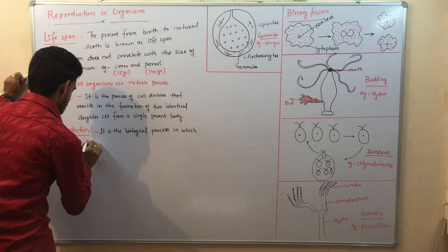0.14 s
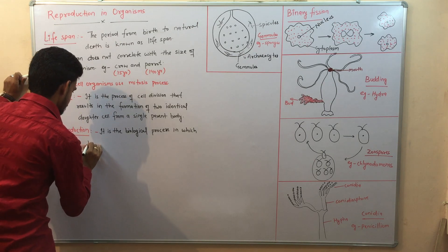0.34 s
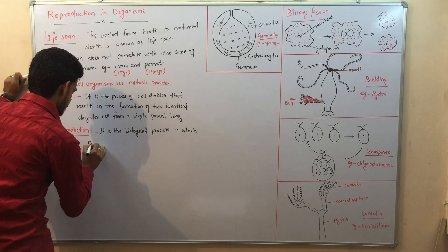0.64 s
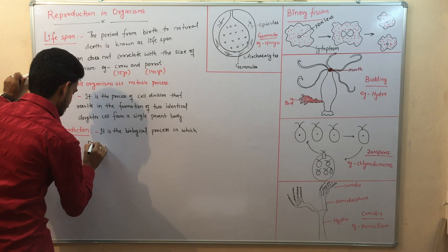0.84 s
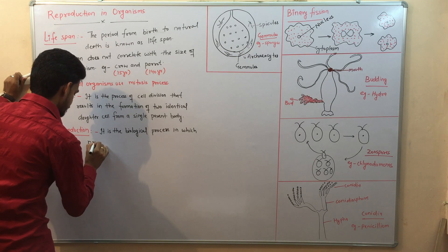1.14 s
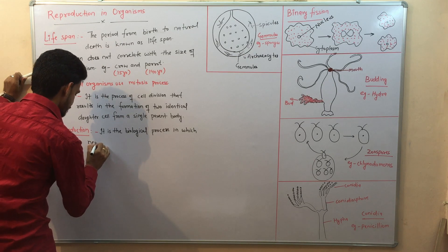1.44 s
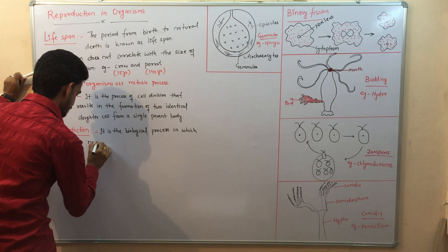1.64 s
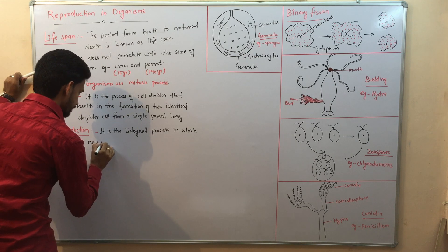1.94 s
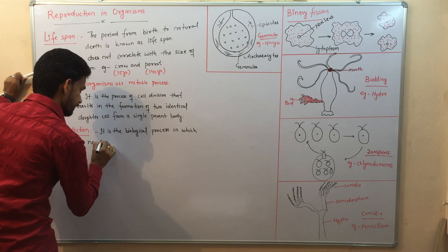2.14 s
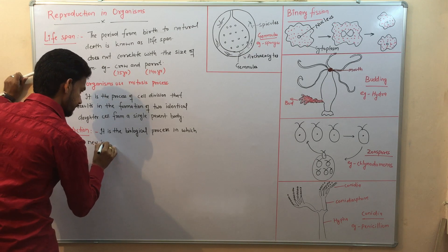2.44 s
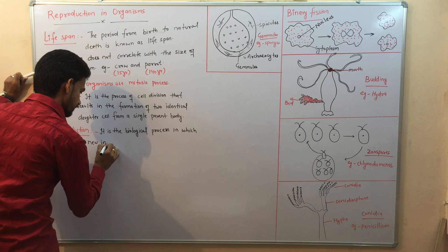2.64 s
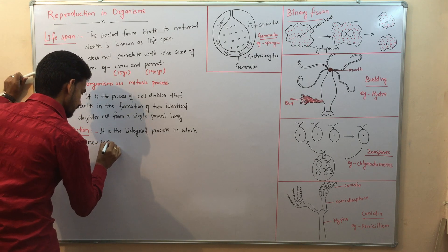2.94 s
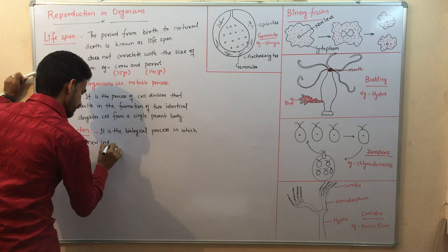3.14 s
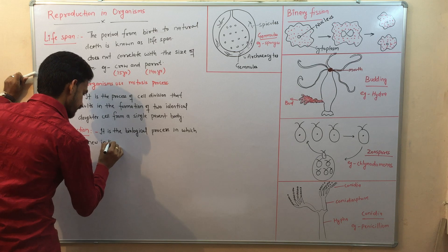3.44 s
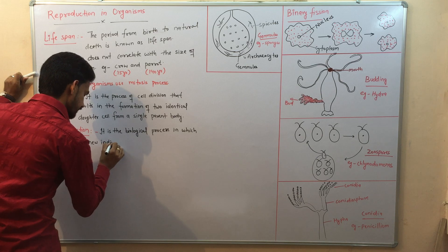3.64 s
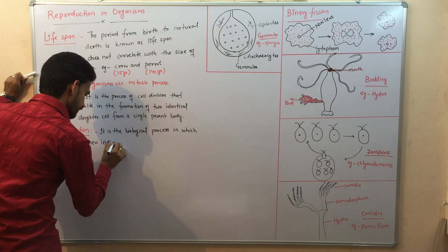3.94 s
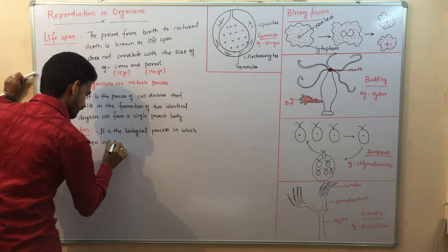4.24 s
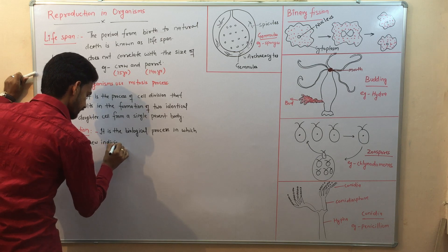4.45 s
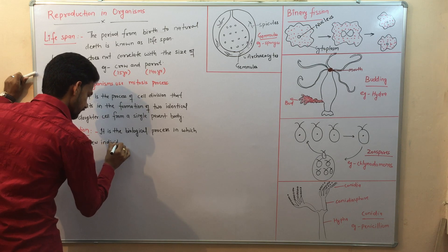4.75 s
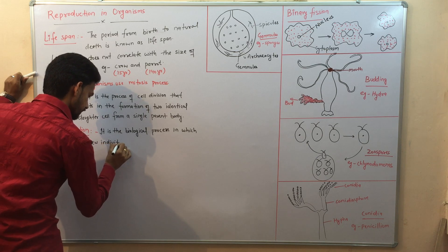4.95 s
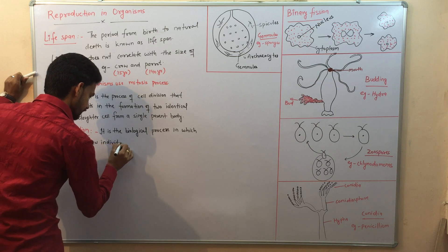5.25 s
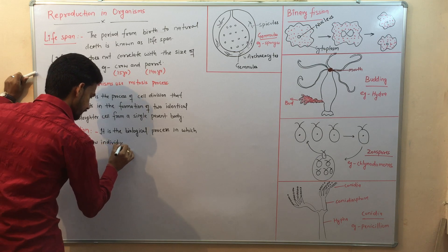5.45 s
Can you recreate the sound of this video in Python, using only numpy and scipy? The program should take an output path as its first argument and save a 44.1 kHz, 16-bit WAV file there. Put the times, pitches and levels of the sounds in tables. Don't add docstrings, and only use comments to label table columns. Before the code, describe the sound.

A felt marker writes on a whiteboard in a small room, short hissing strokes broken by dull taps over a faint low hum.

```python
import sys
import numpy as np
from scipy import signal
from scipy.fft import rfft, irfft, next_fast_len
from scipy.io import wavfile
from scipy.ndimage import uniform_filter1d, map_coordinates

SR = 44100
rng = np.random.default_rng(int(sys.argv[2]) if len(sys.argv) > 2 else 0)


def file_out(sig):
    cols = np.atleast_2d(sig).T
    lim = np.clip(cols, -1, 1)
    pcm = np.round(lim * 32767).astype(np.int16)
    wavfile.write(sys.argv[1], SR, pcm)


def voltage_ratio(decibels):
    exponent = np.asarray(decibels, float) / 20
    return 10 ** exponent


N = 247448


def unit(x):
    return x / np.sqrt(np.mean(x ** 2) + 1e-20)


def along(points, hz):
    f, v = np.transpose(points)
    return np.interp(np.log(hz + 1), np.log(f + 1), v)


def curves(rows):
    s, *columns = np.transpose(rows)
    return [np.interp(np.arange(N) / SR, s, column) for column in columns]


def wobble(rate):
    knots = rng.standard_normal(int(N * rate / SR) + 4)
    return map_coordinates(knots, [np.arange(N) * rate / SR])


def filtered(x, response):
    m = next_fast_len(N + SR)
    return irfft(rfft(x, m) * response(np.fft.rfftfreq(m, 1 / SR)), m)[:N]


def resonant(x, peaks, sharp=1):
    def body(f):
        total = 0
        for k, (center, width, db) in enumerate(peaks):
            ring = 1j * f * width / (center * center - f * f + 1j * f * width)
            total = total + (-1) ** k * voltage_ratio(db) * ring
        return total * np.abs(total) ** (sharp - 1)
    return unit(filtered(x, body))


def fibres(spiky_db, patchy_db):
    catches = rng.standard_normal(N) * voltage_ratio(spiky_db * wobble(900))
    z = signal.stft(catches, nperseg=256)[2]
    patches = uniform_filter1d(rng.standard_normal(z.shape), 3, axis=0)
    patches = uniform_filter1d(patches, 22, axis=1)
    return signal.istft(z * voltage_ratio(patchy_db * unit(patches)), nperseg=256)[1][:N]


GRIP_S, JUMP_DB = 0.0092, 3.5
FADE_DB, FADE_BEND = 16, 1.37
PANEL_GROWS = 0.61
# [start t/s, rise t/s, fall t/s, peak level/dB, panel share level/dB]
STARTS = [(0.31, 0.088, 0.045, -58, -4.5), (0.456, 0.042, 0.061, -57.5, -4),
          (0.858, 0.029, 0.022, -70.5, -1), (1.266, 0.032, 0.1, -61.5, -4.5),
          (1.465, 0.016, 0.12, -64, -2.5), (1.571, 0.072, 0.045, -59.5, -3), (1.952, 0.071, 0.054, -60, -4),
          (2.17, 0.023, 0.18, -71, 2), (2.352, 0.038, 0.069, -59, -4.5), (2.476, 0.049, 0.051, -57.5, -0.5),
          (2.794, 0.015, 0.056, -60, 0), (3.104, 0.04, 0.07, -56, -5), (3.331, 0.038, 0.063, -58.5, -4),
          (3.566, 0.036, 0.028, -69, -5), (3.712, 0.051, 0.068, -58, -4), (3.851, 0.028, 0.086, -56.5, -3),
          (4.04, 0.044, 0.054, -62.5, -4.5), (4.772, 0.047, 0.09, -59, -4), (4.979, 0.012, 0.015, -71, 0),
          (5.029, 0.019, 0.119, -59.5, -4.5), (5.379, 0.019, 0.016, -68, -1),
          (5.435, 0.034, 0.091, -62, -2)]
# [peak t/s, rise t/s, fall t/s, peak level/dB, panel share level/dB]
SWELLS = [(0.607, 0.092, 0.077, -57.5, -7.5), (0.954, 0.046, 0.04, -62.5, -2.5),
          (1.071, 0.11, 0.081, -61, -8), (1.402, 0.031, 0.035, -64, -3), (2.617, 0.091, 0.07, -57.5, -5.5),
          (2.903, 0.07, 0.078, -62.5, -1.5), (3.04, 0.065, 0.054, -58, -6),
          (4.536, 0.059, 0.2, -62.5, -3.5), (4.704, 0.067, 0.075, -59, -3), (5.177, 0.052, 0.084, -59, 0.5),
          (5.591, 0.068, 0.1, -63, -6), (0.055, 0.25, 0.093, -72.5, 7.5)]


def speed():
    t, hiss, panel = np.arange(0, N / SR, 0.0005), 0, 0
    for sudden, table in ((True, STARTS), (False, SWELLS)):
        for s, rise, fall, db, share_db in table:
            late = t - s - rise * sudden
            loss_db = FADE_DB * np.abs(late / np.where(late < 0, rise, fall)) ** FADE_BEND
            grip = 1
            if sudden:
                loss_db = np.where(late < 0, JUMP_DB * (late / rise) ** 2, loss_db)
                grip = np.clip((t - s) / GRIP_S, 0, 1)
            hiss = hiss + (grip * voltage_ratio(db - loss_db)) ** 2
            panel = panel + (grip * voltage_ratio(db + share_db - PANEL_GROWS * loss_db)) ** 2
    return [np.interp(np.arange(N) / SR, t, power) for power in (hiss, panel)]


# [f/Hz, width f/Hz, level/dB]
UPRIGHT = [(3050, 700, -5.5), (4480, 600, -1), (6030, 700, -4.5), (6640, 670, -1.5), (8340, 3040, -7.5)]
LEANING = [(3210, 1130, -5), (4656, 560, 0), (5245, 650, -1), (6990, 640, -1.5), (8650, 2600, -10)]
# [t/s, share 0-1]
LEAN = [
    (0, 0.18),
    (1.5, 0.03),
    (2.4, 0.3),
    (2.9, 0.7),
    (3.8, 0.93),
    (5.61, 0.98),
]
# [f/Hz, width f/Hz, level/dB]
FELT = [(12000, 3900, -5.5), (13000, 400, 4), (14450, 9000, -5.5)]
# [f/Hz, width f/Hz, level/dB]
FACE = [(396, 92, 0), (689, 69, 0.5), (1044, 94, -5.5), (1294, 76, -5.5), (1463, 68, -3), (1840, 133, -7.5),
        (2440, 660, -16)]
BRIGHT_DB, BRIGHT_LEAN_DB = -6, -3
GAP_HZ, GAP_WIDTH_HZ, GAP_DEPTH = 11100, 320, 0.5


def strokes():
    hiss, panel = np.sqrt(speed())
    lean = np.clip(curves(LEAN)[0], 0, 1)
    force = fibres(spiky_db=0.9, patchy_db=2.5)
    force = filtered(force, lambda hz: 1 / np.sqrt(1 + (4000 / (hz + 1)) ** 6))
    upright = resonant(force, UPRIGHT, sharp=1.42)
    leaning = resonant(force, LEANING, sharp=1.52)
    barrel = unit((1 - lean) * upright + lean * leaning)
    felt = resonant(fibres(spiky_db=3.0, patchy_db=-2.0), FELT)
    sound = barrel + voltage_ratio(BRIGHT_DB + BRIGHT_LEAN_DB * lean) * felt
    sound = filtered(sound, lambda hz: 1 - GAP_DEPTH / (1 + ((hz - GAP_HZ) / GAP_WIDTH_HZ) ** 2))
    face = resonant(fibres(spiky_db=5.0, patchy_db=1.0), FACE)
    return voltage_ratio(0.24 * wobble(37)) * (hiss * sound + panel * face)


# [t/s, push level/dB, contact t/ms, ring level/dB]
TAPS = [(0.2844, -40, 1.13, 4), (0.4599, -51, 0.35, 6.5), (0.848, -42.5, 1.13, 0.5), (1.07, -56, 0.37, 8),
        (1.2313, -38.5, 1.3, -2.5), (1.9191, -34, 1.27, 9.5), (2.1772, -31.5, 0.96, 8),
        (2.3553, -29.5, 1.12, -3.5), (2.8004, -30.5, 1.03, -3.5), (3.3007, -30, 1.28, 6.5),
        (3.5439, -29.5, 0.94, 7.5), (3.713, -29.5, 1.1, -17), (4.0355, -32.5, 1.46, -2),
        (4.256, -28, 0.86, 6), (4.4593, -31, 0.93, 3.5), (4.9853, -30.5, 1.07, -5.5), (5.12, -44, 2.1, -4),
        (5.386, -29.5, 1.2, -13.5), (5.511, -54, 2.2, -11), (5.606, -47, 1.4, -8)]
# [f/Hz, level/dB, time to fall 60 dB t/s]
PANEL = [(60, -30, 0.44), (81.76, -23.5, 0.9), (109.4, -24.5, 0.46), (137.6, -14, 0.25),
         (174.6, -14.5, 0.83), (193.9, -27.5, 0.4), (235.4, -29.5, 1), (264.55, -21, 0.71),
         (326, -26, 0.058), (405.5, -5.5, 0.11), (396, -21.5, 0.9), (437, -23, 0.051), (481, -10, 0.1),
         (590, -11.5, 0.14), (675.6, -13.5, 0.16), (758, -15, 0.084), (918, -20, 0.13)]


def taps():
    out, t = np.zeros(N + 2 * SR), np.arange(-400, SR) / SR
    t_ms = t * 1000
    hz, level, t60 = np.transpose(PANEL)[:, :, None]
    chance = rng.standard_normal((len(TAPS), 2, len(PANEL), 1))
    for (s, db, ms, ring_db), (luck, lag) in zip(TAPS, chance):
        reach = np.exp(-(2 * np.pi * hz * ms * 0.00044) ** 2 / 2) * voltage_ratio(ring_db * (hz > 300))
        phase = 2 * np.pi * hz * t + lag * np.pi * (hz > 450)
        fading = voltage_ratio(level + 1.05 * luck - 60 * t / t60)
        ring = np.sum(reach * fading * np.cos(phase), axis=0)
        rise = 0.5 + 0.5 * np.tanh((t_ms + 0.11) / ms)
        push = np.exp(-(t_ms / ms) ** 2 / 2)
        rebound = 0.11 * np.exp(-((t_ms - 2.5 * ms) / (0.61 * ms)) ** 2 / 2)
        out[round(s * SR):][:len(t)] += voltage_ratio(db) * (ring * rise + 0.91 * (push - rebound / 1.0)
                                                   - 0.0 * rebound)
    return out[400:N + 400]


# [f/Hz, level/dB, time to fall 60 dB t/s]
LURCH = [(8.595, 3, 1.64), (24.68, -5, 1.87)]
LURCH_RISE_S = 0.013


def lurch():
    t, blows = np.arange(SR) / SR, np.zeros(N)
    for s, db, _, _ in TAPS:
        blows[round(s * SR)] = voltage_ratio(db)
    swing = sum(voltage_ratio(db - 60 * t / t60) * np.cos(2 * np.pi * hz * t) for hz, db, t60 in LURCH)
    return signal.fftconvolve(blows, swing * (1 - np.exp(-t / LURCH_RISE_S)))[:N]


CAP_HZ, CAP_DB = 3880, -10
# [t/s, peak level/dB, f/Hz]
CLICKS = [(0.0393, -49.5, 5700), (0.0663, -46, 6300), (0.0946, -52.5, 6100), (0.1517, -46.5, 6300),
          (0.2515, -50.5, 6300), (0.3276, -58, 4700), (0.632, -44, 6060), (1.2286, -54, 7520),
          (1.647, -54, 4470), (2.1764, -62, 4600), (2.1855, -44.5, 6260), (2.2494, -53, 4140),
          (3.5427, -59, 3840), (3.6034, -57, 3530), (4.2557, -58, 4960), (4.2892, -54, 6950),
          (4.473, -65, 3730), (4.9853, -62, 3670), (4.995, -56, 6990), (5.3857, -62, 5070)]


def clicks():
    out, t = np.zeros(N + SR), np.arange(-60, 200) / SR
    bell = np.exp(-(t / np.where(t < 0, 0.00012, 0.00036)) ** 2 / 2)
    cap = voltage_ratio(CAP_DB) * np.sin(2 * np.pi * CAP_HZ * t)
    chance = rng.standard_normal((len(CLICKS), len(t)))
    for (s, db, hz), crack in zip(CLICKS, chance):
        snap = (np.sin(2 * np.pi * hz * t) + cap + 0.22 * crack) * bell
        out[round(s * SR):][:len(t)] += voltage_ratio(db - 0.5) * snap
    return out[40:N + 40]


# [f/Hz, width f/Hz, level/dB]
BUZZ_LOW = [(690, 140, 0.5), (1017, 190, 0.51), (1420, 170, 1.2)]
BUZZ_HIGH = [(2440, 480, 3), (3030, 250, 8), (5100, 4000, -7)]
# [t/s, peak level/dB, time
# to fall 60 dB t/s, upper share level/dB]
RATTLES = [(0.0, -51.5, 0.029, -3.5), (0.458, -64, 0.072, 1), (1.071, -71, 0.046, -16),
           (1.232, -61.5, 0.045, -9), (1.645, -53, 0.068, -14), (2.179, -53.5, 0.075, -16),
           (2.203, -56, 0.095, -7), (2.82, -55.5, 0.088, -6), (2.842, -58.5, 0.14, -3.5),
           (3.54, -59.5, .05, -25), (3.856, -60.5, 0.53, -16), (4.253, -57, 0.086, -26),
           (4.4705, -51, 0.17, -12), (4.988, -51.5, 0.15, -26), (5.39, -61.5, 0.17, -8)]


def rattles():
    t, out = np.arange(N) / SR, np.zeros(N)
    low = resonant(fibres(spiky_db=1, patchy_db=2.5), BUZZ_LOW)
    high = resonant(fibres(spiky_db=1, patchy_db=2.5), BUZZ_HIGH)
    for s, db, t60, upper_db in RATTLES:
        part = slice(round(s * SR), round(s * SR) + SR // 4)
        age = t[part] - s
        envelope = voltage_ratio(db + 2.0 - 60 * age / t60) * (1 - np.exp(-age / 0.0021))
        out[part] += envelope * (low[part] + voltage_ratio(upper_db) * high[part])
    return out


# [f/Hz, level/dB]
ROCK = [(7.5, -3), (10.5, 0)]
BEND = [(18.2, -5), (25, -8.5)]
# [f/Hz, width f/Hz, level/dB]
DRUM = [(49.7, 7.4, 0.5), (58.1, 3.84, 7.5), (81, 5, 0)]
# [t/s, push level/dB, shuffle level/dB]
PRESS = [(0.0, -42.5, -50.5), (0.61, -36, -59), (2.19, -36, -55.5), (2.3, -24, -51), (2.39, -34, -63.5),
         (2.89, -31.5, -51.5), (3.03, -39.5, -53), (3.39, -26.5, -59), (3.94, -27, -53.5),
         (4.05, -39.5, -51), (4.37, -27, -49), (4.55, -39, -58.5), (5.11, -26.5, -51), (5.37, -33.5, -55),
         (5.5, -23, -56), (5.61, -32, -64)]
ROCK_DB, BEND_DB, DRUM_DB = -2.5, -9, 4


def sway():
    def swing(lines):
        total = 0
        for hz, db in lines:
            cycles = np.cumsum(hz + 0.5 * wobble(3.135)) / SR
            total = total + voltage_ratio(db) * np.sin(2 * np.pi * cycles)
        return unit(total)

    press_db, shuffle_db = curves(PRESS)
    loose = voltage_ratio(ROCK_DB) * swing(ROCK) + voltage_ratio(BEND_DB + 4.8 * wobble(5.5)) * swing(BEND)
    drum_db = DRUM_DB + shuffle_db + 1.27 * wobble(6.04)
    return voltage_ratio(press_db) * loose + voltage_ratio(drum_db) * resonant(rng.standard_normal(N), DRUM)


# [f/Hz, time to fall 60 dB t/s]
WALLS = [(150, 0.9), (1000, 0.42), (5000, 0.2), (15000, 0.28)]


def walls(x):
    hz, t, z = signal.stft(rng.standard_normal(SR // 2), SR, nperseg=256)
    fading = voltage_ratio(-60 * t / along(WALLS, hz)[:, None])
    tail = signal.istft(z * fading, SR, nperseg=256)[1]
    late = np.pad(x, (300, 0))
    return signal.fftconvolve(late, tail / np.linalg.norm(tail))[:N]


# [f/Hz, level/dB per Hz]
ROOM = [(60, -16), (100, -5), (180, 0.5), (300, -9.5), (400, -12.5), (570, -7), (760, -8.5), (950, -14.5),
        (1400, -18), (2100, -23.5), (4000, -27), (6500, -27.5), (10000, -31.5), (15800, -33)]
# [t/s, level/dB]
HUM = [
    (0, -60),
    (.7, -61.5),
    (2, -62.5),
    (3.2, -62),
    (5.61, -64.5),
]


def hum():
    def rumble(hz):
        return voltage_ratio(along(ROOM, hz)) * (hz > 60) / (1 + (hz / 900) ** 4)

    def hiss(hz):
        return voltage_ratio(along(ROOM, hz)) / (1 + (900 / (hz + 1)) ** 4)

    low = unit(filtered(fibres(spiky_db=0.3, patchy_db=1.5), rumble))
    high = unit(filtered(rng.standard_normal(N), hiss))
    return voltage_ratio(curves(HUM)[0]) * low + voltage_ratio(-71 + 1.2 * wobble(3.6)) * high


def scene():
    pen = strokes() + clicks() + rattles()
    board = taps()
    room = walls(voltage_ratio(-13) * pen + voltage_ratio(-10.5) * board)
    return (pen + board + room + sway() + lurch() + hum())[None]


def roll_off(x):
    return signal.sosfilt(signal.butter(12, 15800, fs=SR, output="sos"), x)


def record(dry):
    mix = filtered(dry[0], lambda hz: hz < 15780)[None]
    return roll_off(mix)


dry = scene()
out = record(dry)
file_out(out)
```